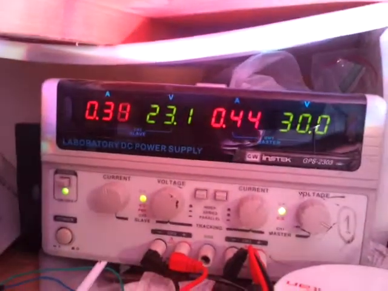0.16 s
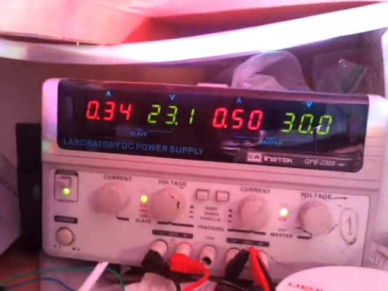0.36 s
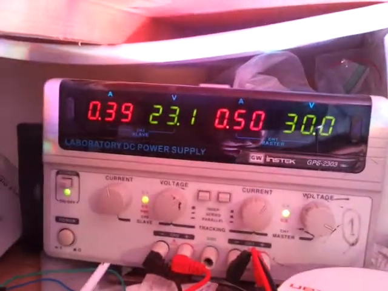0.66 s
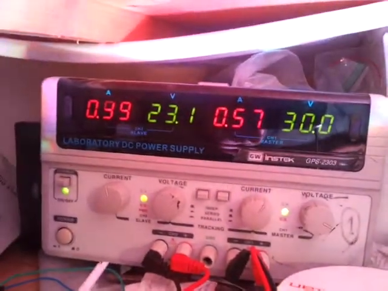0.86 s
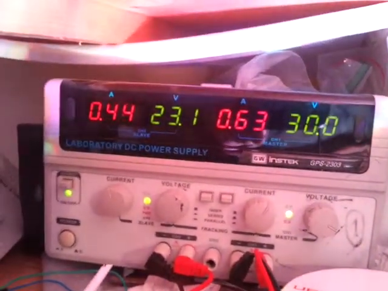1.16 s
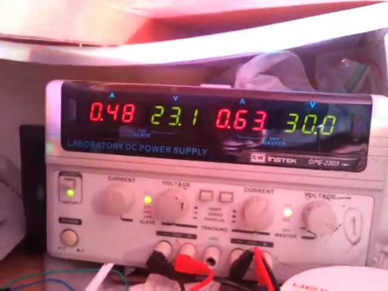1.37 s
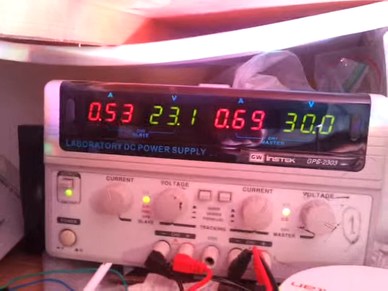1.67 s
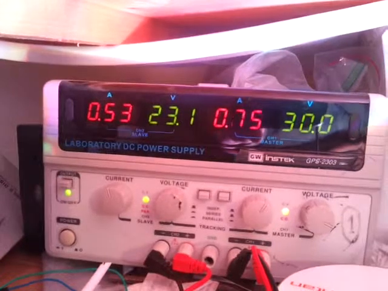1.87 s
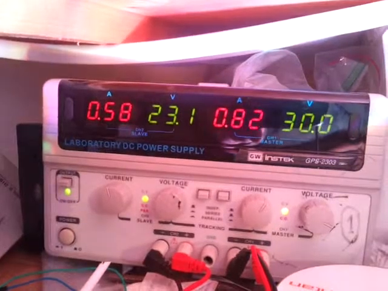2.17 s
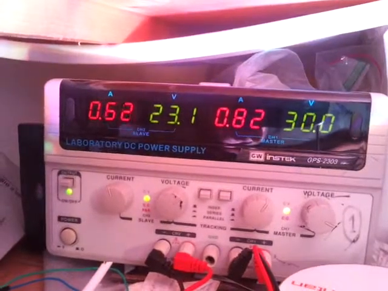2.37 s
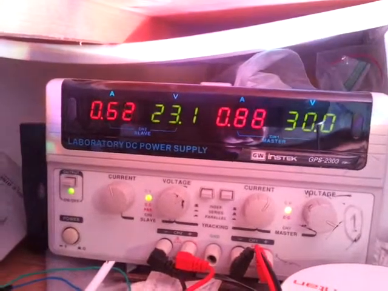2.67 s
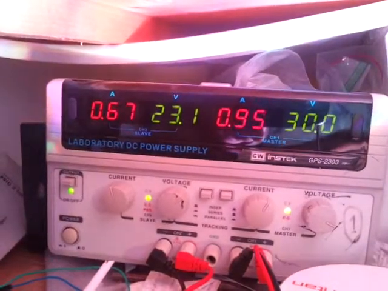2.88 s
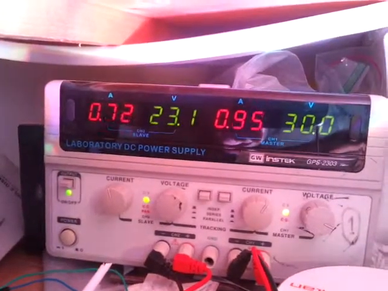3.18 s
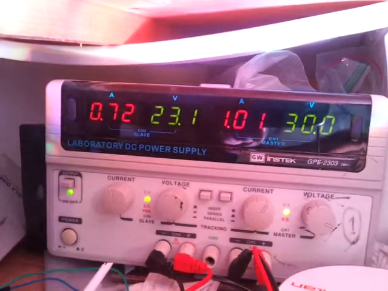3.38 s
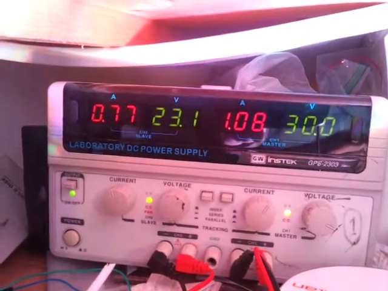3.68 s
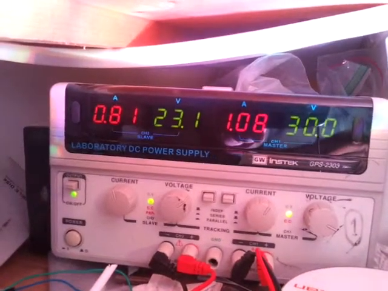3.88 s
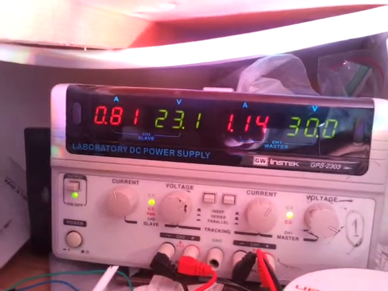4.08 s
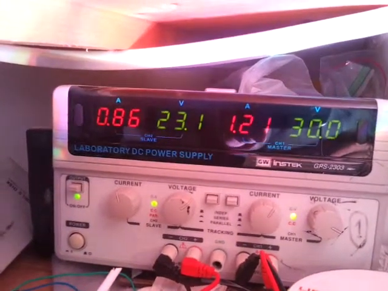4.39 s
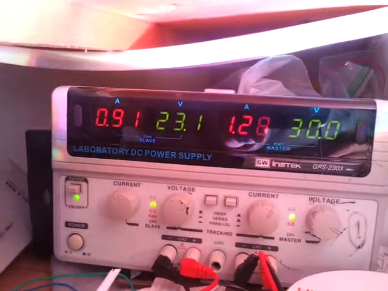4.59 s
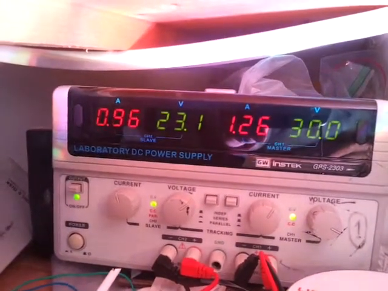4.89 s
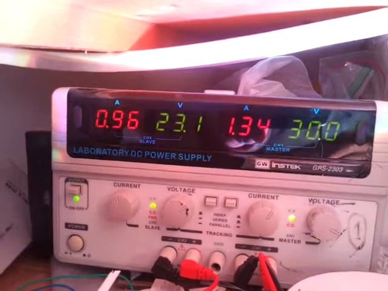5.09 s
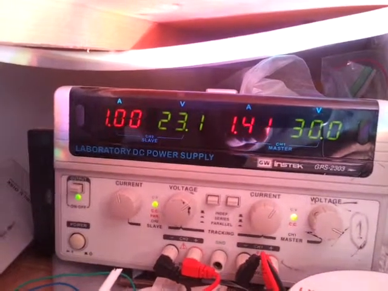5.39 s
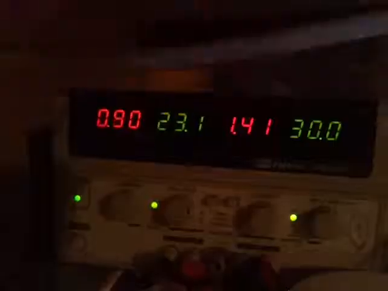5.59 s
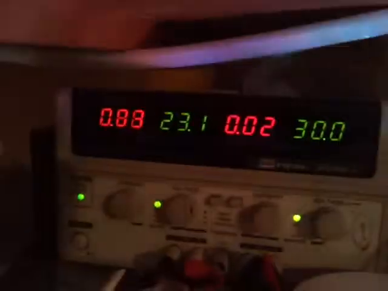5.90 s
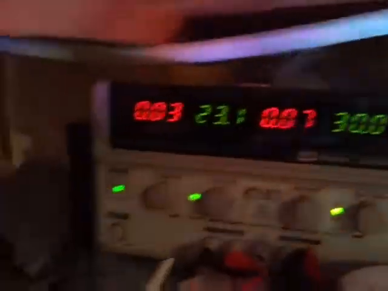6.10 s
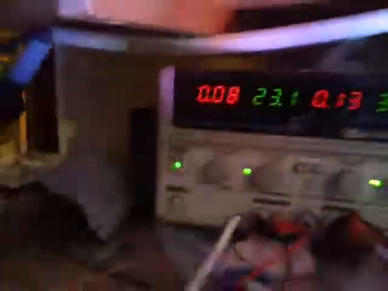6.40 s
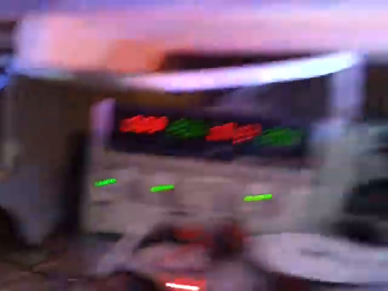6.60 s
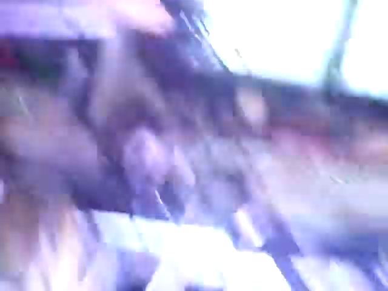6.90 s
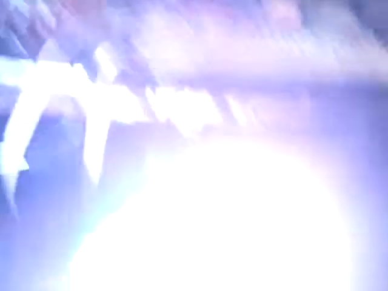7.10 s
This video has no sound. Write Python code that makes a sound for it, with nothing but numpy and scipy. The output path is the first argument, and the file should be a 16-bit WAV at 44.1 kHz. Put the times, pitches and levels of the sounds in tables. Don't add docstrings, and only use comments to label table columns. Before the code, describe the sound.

Close to a compact camera in an indoor workspace, a small fan holds a low, slightly wavering hum with airy noise resonating in its metal case. Quiet lens-motor ticks come in even runs, with gaps. Late on, the camera swings away: its plastic body creaks and snaps, the fan fades, a knuckle knocks softly and air rumbles at the microphone.

```python
import sys
import numpy as np
from scipy import signal
from scipy.fft import rfft, irfft
from scipy.io import wavfile
from scipy.ndimage import uniform_filter1d

SR = 44100
rng = np.random.default_rng(int(sys.argv[2]) if len(sys.argv) > 2 else 0)


def gain_from_db(level_db):
    decades = np.asarray(level_db, float) / 20
    return 10 ** decades


def generate_wav(sig):
    pcm = np.round(np.clip(np.atleast_2d(sig).T, -1, 1) * 32767).astype(np.int16)
    wavfile.write(sys.argv[1], SR, pcm)


N = 319284

# t/s, peak level/dB, second slip/dB, dullness/(dB/octave)
SNAPS = [
    (6.4463, -22, 1, -7),
    (6.6058, -24, 4, -1.5),
    (6.7897, -26, 5, -1.5),
    (7.0675, -28.5, -3, -3),
    (7.0865, -33.5, -4, 1.5),
]


def unit(x):
    return x / np.sqrt(np.mean(x ** 2))


def shape(x, points):
    hz, db = np.transpose(points)
    f = np.maximum(np.fft.rfftfreq(N, 1 / SR), 1)
    return irfft(rfft(x) * gain_from_db(np.interp(np.log(f), np.log(hz), db)), N)


def ring(x, hz, width_hz):
    return signal.lfilter(*signal.iirpeak(hz, hz / width_hz, fs=SR), x)


def walk(rate_hz):
    k = int(SR / rate_hz)
    held = np.repeat(rng.standard_normal(N // k + 1), k)
    return unit(uniform_filter1d(uniform_filter1d(held, k), k)[:N])


def curve(table):
    s, value = np.transpose(table)
    return np.interp(np.arange(N) / SR, s, value)


def add(out, s, x):
    i = int(s * SR)
    out[i:i + len(x)] += x[:N - i]


def impulse(length, grit, fall_samples):
    blow = grit * rng.standard_normal(length) * np.exp(-np.arange(length) / fall_samples)
    blow[0] += 1
    return blow


def decay(db, hz, t60_s, push_s=0.00044):
    t = np.arange(4000) / SR
    return gain_from_db(db - 60 * t / t60_s) * np.minimum(t / push_s, 1) * np.sin(2 * np.pi * hz * t)


def swell(start_s, end_s, db, rise_db_s, fall_db_s):
    t = np.arange(N) / SR
    return gain_from_db(db - rise_db_s * np.maximum(start_s - t, 0) - fall_db_s * np.maximum(t - end_s, 0))


def hiss():
    # f/Hz, density/(dB/Hz)
    hiss_density = [(20, -12.5), (33, -6), (52, -7.5), (80, -4.5), (140, -4), (450, -10.5), (620, -10),
                    (1050, -16.5), (1800, -19), (2250, -21), (2550, -20), (3000, -20), (3800, -21.5),
                    (4300, -20.5)]
    level_db = -55 + .3 * walk(5)
    return gain_from_db(level_db) * unit(shape(rng.standard_normal(N), hiss_density))


def supply_coils():
    # f/Hz, level/dB
    whistles = [(5330, -86), (5592, -81.5)]
    t = np.arange(N) / SR
    return sum(gain_from_db(db + 2.5 * walk(3.1)) * np.sin(2 * np.pi * hz * t + walk(2.8)) for hz, db in whistles)


def wind_buffet():
    # f/Hz, density/(dB/Hz)
    buffet_tilt = [(12, -8.5), (30, 4), (60, -2.5), (120, -9), (250, -14), (500, -59.5)]
    gust = unit(shape(rng.standard_normal(N), buffet_tilt)) * gain_from_db(2.5 * walk(40))
    bed = swell(6.99, 7.18, db=-57, rise_db_s=151, fall_db_s=400)
    jolt = swell(7.11, 7.11, db=-54, rise_db_s=250, fall_db_s=250)
    return gust * (bed + jolt)


def air_puffs():
    # t/s, peak level/dB, length/ms
    puffs = [
        (6.99, -45, 17),
        (7.024, -47, 16),
        (7.056, -48, 13),
        (7.097, -43, 17),
        (7.124, -41, 22),
        (7.164, -42, 12),
    ]
    out = np.zeros(N)
    for s, db, ms in puffs:
        swing = np.gradient(np.hanning(int(ms * SR / 1000)))
        add(out, s, rng.choice([-1, 1]) * gain_from_db(db) * swing / swing.max())
    return out


def finger_slide():
    rub = unit(ring(rng.standard_normal(N), 5300, 2400)) * gain_from_db(1.7 * walk(400))
    return rub * swell(7.2, 7.222, db=-57.5, rise_db_s=1500, fall_db_s=900)


def finger_taps():
    # t/s, level/dB, f/Hz
    taps = [
        (7.069, -57, 1300),
        (7.197, -49, 1090),
        (7.2, -59, 1610),
    ]
    out = np.zeros(N)
    for s, db, hz in taps:
        add(out, s, decay(db, hz, t60_s=0.059))
    return out


def body_knocks():
    # f/Hz, level/dB, t60/s
    body_modes = [(300, 1.5, .03), (470, 2.5, 0.043), (644, -5.5, 0.043), (950, -21, .02),
                  (1320, -11.5, .025), (1570, -13, .02), (2000, -15, .018), (2450, -14.5, .013)]
    knock_s, knock_db, flex_s = 7.0838, -35, 0.00215
    snap_share_db = -9
    out = np.zeros(N)
    for k, (hz, mode_db, t60_s) in enumerate(body_modes):
        upper = k > 2
        push_s = .0004 if upper else .003
        add(out, knock_s + flex_s * upper, decay(knock_db + mode_db, hz, t60_s, push_s))
        if upper:
            for s, db, *_ in SNAPS:
                add(out, s, decay(db + snap_share_db + mode_db, hz, t60_s / 2))
    return out


def creaks():
    # t/s, peak level/dB, f/Hz
    slips = [(6.44, -40, 4900), (6.4523, -48, 5600), (6.4601, -28.5, 5030), (6.4815, -41, 5900),
             (6.4848, -41, 4500), (6.5166, -44, 5000), (6.5822, -41, 5600), (6.593, -54, 5000),
             (6.6096, -36, 5400), (6.8097, -45, 5000), (7.003, -52, 5000), (7.024, -44, 5300),
             (7.0748, -42, 5000), (7.0838, -43, 3600), (7.089, -49, 4000), (7.169, -43, 4900),
             (7.2, -44, 5600)]
    width_hz, grit_ms = 1470, .5
    out = np.zeros(N)
    for s, db, hz in slips:
        blow = impulse(400, 0.17, grit_ms * SR / 1000)
        sound = ring(ring(blow, hz, width_hz), hz, 2 * width_hz)
        add(out, s, gain_from_db(db) * sound / np.abs(sound).max())
    return out


def seam_snaps():
    # f/Hz, width/Hz, level/dB
    shell_modes = [(1300, 990, -1.5), (2120, 800, -16), (2780, 710, -6), (4380, 1060, 4.5), (5800, 910, 7),
                   (6660, 1620, 3)]
    gap_ms = .68
    out = np.zeros(N)
    for s, db, later_db, dull_db in SNAPS:
        blow = impulse(400, .03, 30)
        rebound = np.roll(ring(blow, 4500, 3900), int(gap_ms * SR / 1000))
        push = blow + gain_from_db(later_db + 8.5) * rebound
        sound = np.zeros(len(push))
        for k, (hz, width_hz, mode_db) in enumerate(shell_modes):
            mode_gain = gain_from_db(mode_db - dull_db * np.log2(hz / 5000))
            sound += (-1) ** k * mode_gain * ring(push, hz, width_hz)
        add(out, s, gain_from_db(db) * sound / np.abs(sound).max())
    return out


def stalled_steps():
    # t/s, level/dB, f/Hz
    whines = [
        (1.361, -46, 3460),
        (1.428, -47, 3410),
    ]
    t = np.arange(125) / SR
    out = np.zeros(N)
    for s, db, hz in whines:
        tone = np.sin(2 * np.pi * hz * t)
        octave = gain_from_db(3.5) * np.sin(2 * 2 * np.pi * hz * t)
        noise = gain_from_db(-4) * rng.standard_normal(len(t))
        add(out, s, gain_from_db(db) * signal.windows.tukey(len(t), .3) * (tone + octave + noise))
    return out


def lens_motor():
    # first t/s, last t/s, level/dB, fade over run/dB, tooth fall-back/dB
    runs = [(0.0235, .4249, -54.5, -0.5, -1), (0.4917, .826, -54, -2, 2), (.893, .893, -53, 0, -10),
            (0.9593, .9592, -48.5, 0, -1), (1.0272, 1.1594, -51.5, -2.5, -2),
            (1.226, 1.2948, -51, -2.5, -9), (2.404, 2.472, -67.5, 0.5, 8.5),
            (3.4664, 3.6661, -53, 1.5, -6.5), (3.734, 3.9335, -53.5, -1, -8), (4.301, 4.6359, -56, 1, 2),
            (4.7029, 4.7022, -49.5, 0, -17), (4.7352, 4.7356, -49, 0, -19), (5.1731, 5.1731, -68, 0, 6)]
    # f/Hz, width/Hz, level/dB
    barrel_modes = [(3680, 1400, 7.5), (4940, 660, 7), (6100, 820, 13.5)]
    step_s, scatter_db, top_db = .0669, 1.2, -6
    out = np.zeros(N)
    for first_s, last_s, run_db, fade_db, back_db in runs:
        for part in np.linspace(0, 1, round((last_s - first_s) / step_s) + 1):
            s = first_s + (last_s - first_s) * part
            blow = impulse(300, .05, 40)
            for k, (hz, width_hz, mode_db) in enumerate(barrel_modes):
                tone = ring(ring(blow, hz, width_hz), hz, 2 * width_hz)
                db = run_db + fade_db * part + mode_db + (0, back_db, top_db)[k]
                db += scatter_db * rng.standard_normal()
                delay_s = 0.00045 + .0006 * (k == 1)
                add(out, s + delay_s, gain_from_db(db) * tone / tone.max())
    return out


def fan_tones(near_db):
    # t/s, blade rate/Hz
    speed = [
        (0, 264.25),
        (.75, 264.35),
        (1.75, 264.05),
        (3.25, 263.5),
        (4.75, 262.9),
        (5.3, 262.6),
        (5.75, 263),
        (6.25, 264.05),
        (6.75, 264.3),
        (7.24, 264.3),
    ]
    orders = [(7, 0, .9), (14, -34, 1.5), (21, -16.5, 1.2), (24, -25, 1.0), (42, -34, 2.5)]
    blades, upper_shadow = 7, .6
    shaft_hz = curve(speed) * (1 + .0003 * walk(6)) / blades
    turn = 2 * np.pi * np.cumsum(shaft_hz) / SR
    tones = np.zeros(N)
    for k, db, wobble_db in orders:
        shadow = upper_shadow if k > blades else 1
        gain = gain_from_db(db + wobble_db * walk(9) + shadow * near_db)
        tones += gain * np.sqrt(2) * np.sin(round(k) * turn + 2 * np.pi * rng.random())
    return gain_from_db(-45) * tones


def case_air(near_db):
    # f/Hz, width/Hz, level/dB
    case_modes = [(201.7, 45, -8.5), (271.5, 38, -1), (301.2, 11, 2.5), (318.5, 13, 1.5), (338.7, 18, -3),
                  (362, 15, -5.5), (390.6, 42.5, -3.5), (721, 45, -14.5), (767, 45, -14.5),
                  (928, 86, -19.5), (1249, 250, -25), (1546, 320, -30), (2180, 470, -29.5)]
    air = np.zeros(N)
    for hz, width_hz, db in case_modes:
        noise = rng.standard_normal(N)
        air += gain_from_db(db + 0.35 * walk(4)) * ring(ring(noise, hz, width_hz), hz, 2.08 * width_hz)
    direct, room = gain_from_db(-48.5 + 1.4 * near_db), gain_from_db(-59)
    return np.hypot(direct, room) * unit(air)


def fan():
    # t/s, level/dB
    nearness = [
        (0, 0),
        (2, -.5),
        (6.2, -.5),
        (6.4, 1),
        (6.6, -1),
        (6.75, -3.5),
        (6.9, -8),
        (7.0, -10),
        (7.12, -15.5),
        (7.24, -14),
    ]
    near_db = curve(nearness)
    return fan_tones(near_db) + case_air(near_db)


def scene():
    background = hiss() + supply_coils()
    air = wind_buffet() + air_puffs()
    fingers = finger_slide() + finger_taps() + body_knocks()
    plastic = creaks() + seam_snaps()
    lens = stalled_steps() + lens_motor()
    return (background + air + fingers + plastic + lens + fan())[None]


def band_limit(x):
    return signal.sosfilt(signal.butter(12, 8700, fs=SR, output="sos"), x)


def record(dry):
    # f/Hz, level/dB
    port = [(4300, 1), (5200, 4), (5800, -3.5), (6500, -7.5), (7200, -14.5), (7700, -25.5), (8000, -42),
            (8450, -30), (9000, -51.5)]
    mix = shape(dry[0], port)[None]
    return band_limit(mix)


dry = scene()
out = record(dry)
generate_wav(out)
```